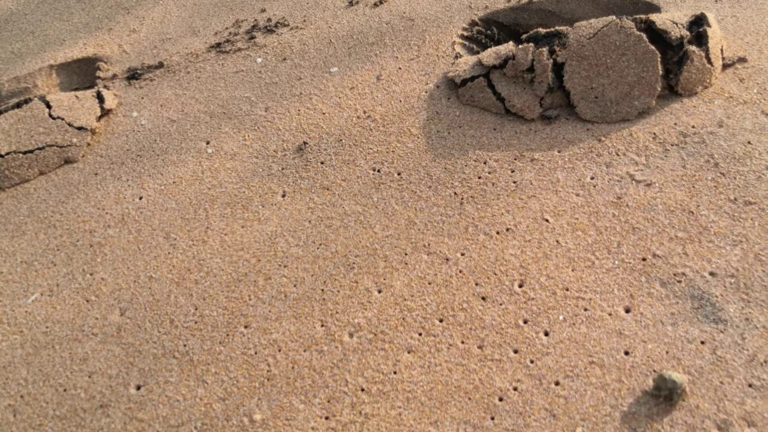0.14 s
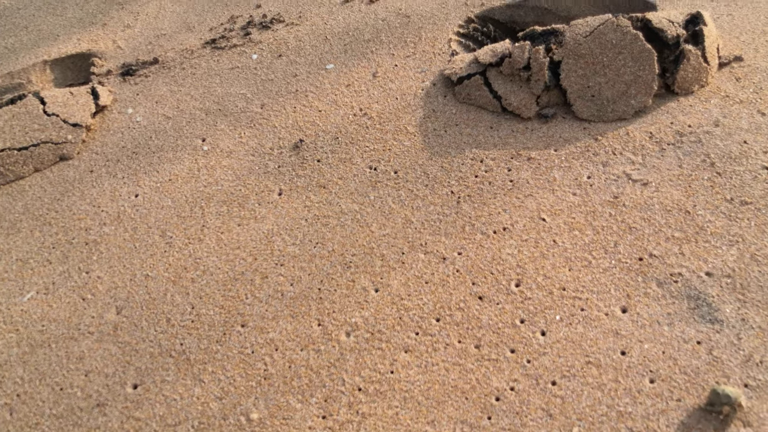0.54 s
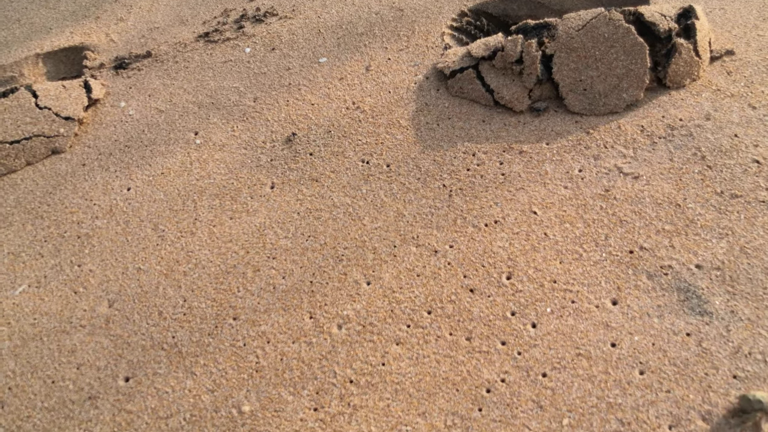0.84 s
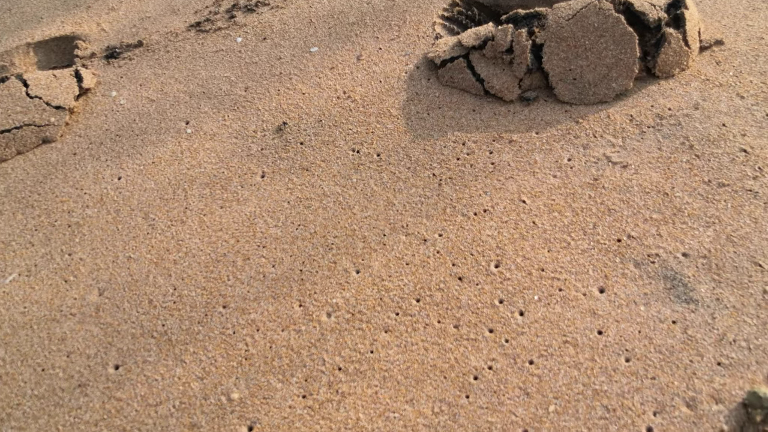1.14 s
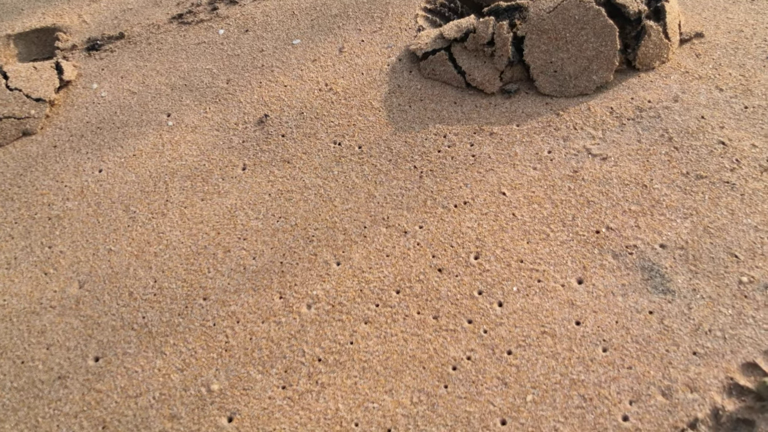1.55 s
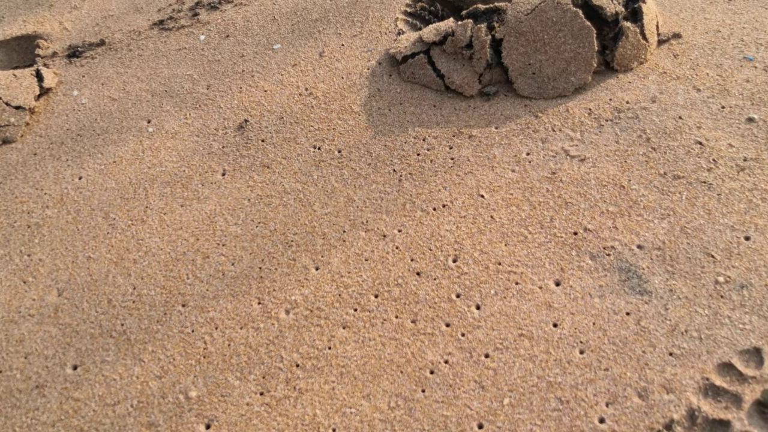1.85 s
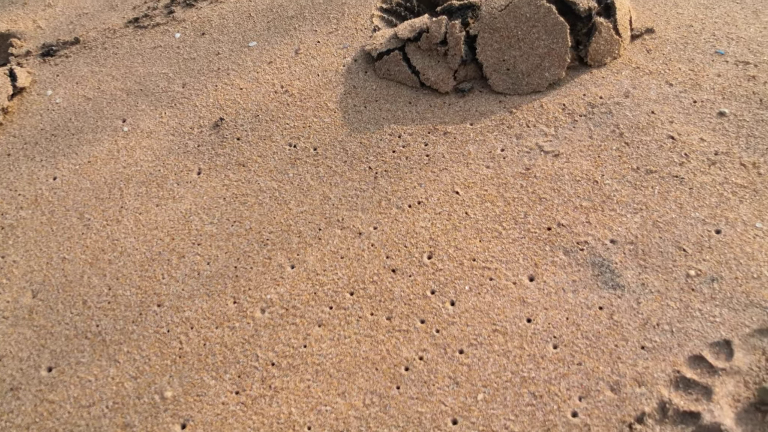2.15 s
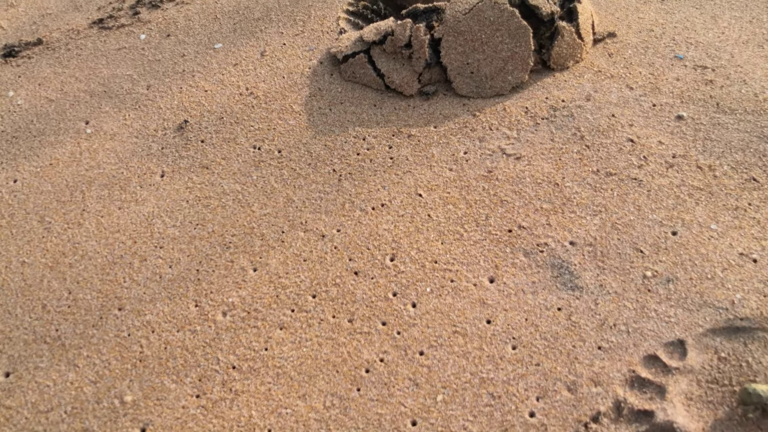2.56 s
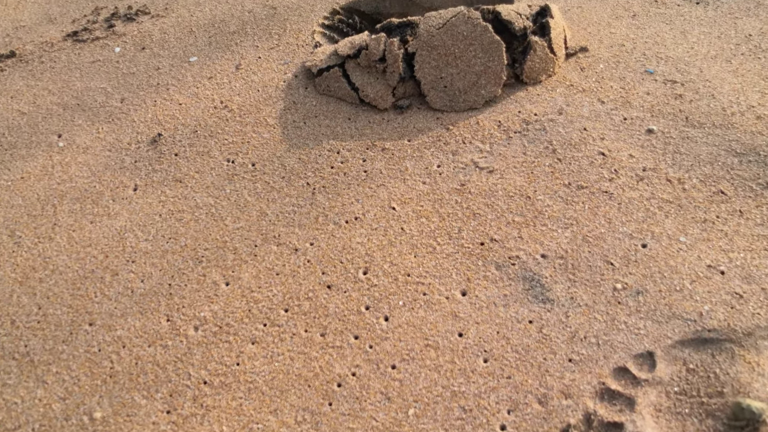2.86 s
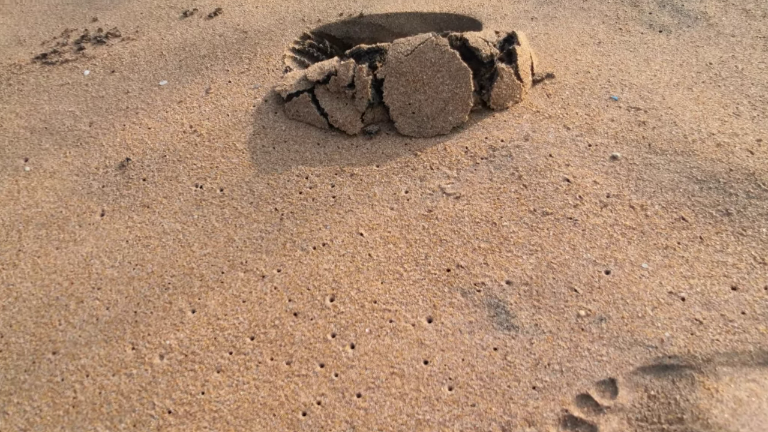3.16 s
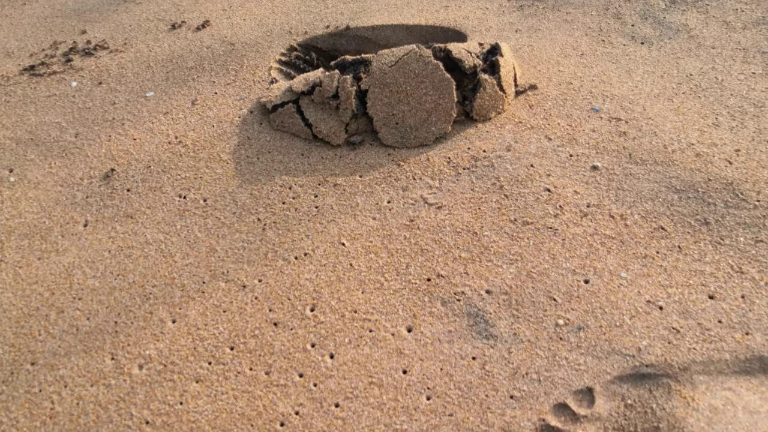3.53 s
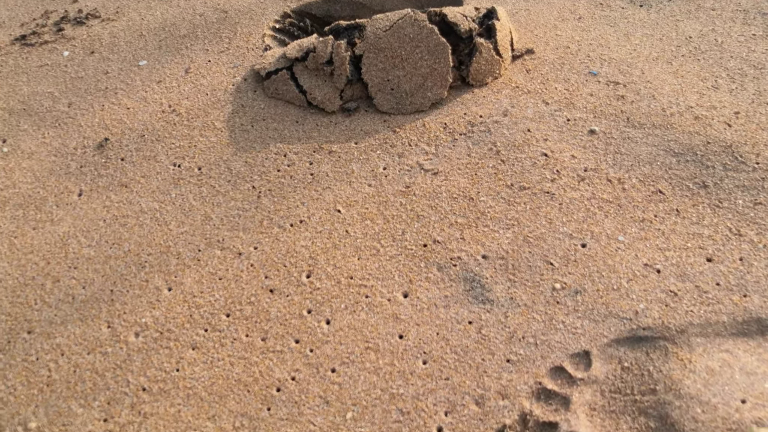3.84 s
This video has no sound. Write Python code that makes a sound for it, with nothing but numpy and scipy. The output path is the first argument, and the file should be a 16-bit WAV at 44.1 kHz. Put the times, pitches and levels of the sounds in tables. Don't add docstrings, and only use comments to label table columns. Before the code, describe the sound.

On an open sandy beach, breakers roar low and foam fizzes continuously, captured in stereo by a phone; faint gusts buffet the microphone, then several short grainy footsteps press into sand in the last part.

```python
import sys
import numpy as np
from scipy import signal
from scipy.fft import rfft, irfft, next_fast_len
from scipy.io import wavfile
from scipy.ndimage import uniform_filter1d

SR = 44100
rng = np.random.default_rng(int(sys.argv[2]) if len(sys.argv) > 2 else 0)


def voltage_ratio(decibels):
    exponent = np.asarray(decibels, float) / 20
    return 10 ** exponent


def unload_audio(sound):
    columns = np.transpose(np.atleast_2d(sound))
    steps = np.round(np.clip(columns, -1, 1) * 32767)
    wavfile.write(sys.argv[1], SR, steps.astype(np.int16))


N = 176400
TIME_S = np.arange(N) / SR
PAD = next_fast_len(N + 4096)
HZ = np.arange(PAD // 2 + 1) * SR / PAD


def unit(x):
    return x / np.sqrt(np.mean(x ** 2))


def curve(table, col):
    table = np.array(table)
    return np.interp(TIME_S, table[:, 0], table[:, col])


def over_hz(table, hz):
    table = np.array(table)
    return np.interp(np.log(hz + 1), np.log(table[:, 0] + 1), table[:, 1])


def shape(x, gain):
    return irfft(rfft(x, PAD) * gain, PAD)[..., :N]


def walk(rate_hz):
    hold = int(SR / rate_hz)
    levels = np.repeat(rng.standard_normal(N // hold + 1), hold)
    smooth = uniform_filter1d(uniform_filter1d(levels, hold), hold)
    return 1.46 * smooth[:N]


def grains(per_s, spread_db):
    present = rng.random(N) < per_s / SR
    sign = rng.standard_normal(N)
    size = rng.exponential(size=N)
    return unit(present * sign * voltage_ratio(spread_db * np.minimum(size, 4)))


def wash(src, tone, lo_hz, hi_hz, tilt_db, patchy_db, flicker_db, rate_hz):
    spectrum = rfft(src, PAD) * voltage_ratio(over_hz(tone, HZ))
    out = 0
    near = walk(rate_hz / 4)
    for hz in lo_hz * 2 ** np.arange(0, np.log2(hi_hz / lo_hz), 1 / 3):
        near = 0.8 * near + 0.6 * walk(rate_hz / 4)
        thirds = np.clip(3 * np.log2((HZ + 1) / hz), -1, 1)
        band = irfft(spectrum * np.cos(np.pi / 2 * thirds) ** 2, PAD)[..., :N]
        tilt = tilt_db * np.log2(hz / 2500)
        out = out + band * voltage_ratio(patchy_db * near + flicker_db * walk(rate_hz) + tilt)
    return unit(out)


# frequency in Hz, likeness from 0 to 1.
LIKENESS = [(100, 0.97), (220, .95), (400, 0.87), (650, 0.37), (850, 0.23), (1150, 0.51), (1700, 0.155),
            (2400, 0.4), (3200, .2), (15000, 0.058)]
# frequency in Hz, lead in radians.
LEAD = [(0, -0.5), (300, 0.97), (700, 3.5), (1250, 2.5), (1850, 6.5), (2700, 10.5), (3300, 9.5),
        (4800, 14.5), (6000, 9.5), (8000, 17)]


def ports(pair):
    like = np.clip(over_hz(LIKENESS, HZ), 0, 1)
    lead = np.array(LEAD)
    late = np.exp(-1j * np.interp(HZ, lead[:, 0], lead[:, 1]))
    shared = shape(pair[0], like * late)
    own = shape(pair[1], np.sqrt(1 - like ** 2))
    return np.array([pair[0], shared + own])


# time in seconds, level in dB.
ROAR_LEVEL = [(0.37, -36.5), (0.73, -33.5), (0.89, -36.5), (0.93, -33.5), (1.11, -36), (1.14, -32.5),
              (1.43, -35), (1.45, -34), (2.33, -36), (2.63, -33.5), (2.66, -35.5), (3.33, -32.5),
              (3.82, -35.5), (3.92, -32.5), (3.94, -39), (4.0, -33)]
# frequency in Hz, density in dB per Hz.
ROAR_TONE = [(25, -34), (50, -8.5), (100, -3.5), (170, 0.5), (280, -1.5), (430, -6.5), (650, -16),
             (1200, -21.5)]


def roar():
    noise = rng.standard_normal((2, N))
    rumble = wash(noise, ROAR_TONE, 20, 1600, tilt_db=0, patchy_db=0, flicker_db=0.5, rate_hz=10)
    return rumble * voltage_ratio(curve(ROAR_LEVEL, 1))


# time in seconds, level in dB, brightness in dB per octave.
FOAM_RUN = [(.37, -43.5, -0.5), (.42, -46.5, -0.5), (.55, -43.5, 0), (.9, -42, -0.5), (1.3, -41.5, -0.5),
            (1.57, -41.5, 0), (1.7, -42, 0.5), (2.05, -42, 0.5), (2.25, -41.5, -0.5), (2.42, -41.5, 0),
            (2.6, -40.5, -0.5), (2.85, -40.5, .5), (3.05, -39.5, 1.5), (3.3, -40.5, 0), (3.55, -41.5, 0.5),
            (3.8, -42.5, -.3), (4.0, -41, -0.5)]
# frequency in Hz, density in dB per Hz.
FOAM_TONE = [(300, -19), (700, -5), (1500, -2.5), (3000, -4), (6000, -8), (8800, -14), (9900, -25),
             (15500, -38.5)]


def foam():
    fizz_share = 0.15
    src = []
    for _ in range(2):
        fizz = grains(per_s=8000, spread_db=1)
        hiss = rng.standard_normal(N)
        src.append(np.sqrt(fizz_share) * fizz + np.sqrt(1 - fizz_share) * hiss)
    bright = curve(FOAM_RUN, 2)
    hissing = wash(np.array(src), FOAM_TONE, 268, 17000, bright, patchy_db=0.72, flicker_db=0.35, rate_hz=14)
    return hissing * voltage_ratio(curve(FOAM_RUN, 1))


# time in seconds, level in dB.
GUSTS = [(0.4, -55), (1.73, -58), (1.98, -48), (2.06, -62), (2.95, -52), (3.08, -62), (3.16, -49),
         (3.29, -63), (3.38, -43), (3.53, -58), (3.89, -54), (3.98, -41.5)]


def wind():
    rumble_hz, apart = 45, 0.08
    gain = HZ / (HZ + 15) / (1 + (HZ / rumble_hz) ** 2)
    air = unit(shape(rng.standard_normal((2, N)), gain))
    air = air * voltage_ratio(curve(GUSTS, 1) - 3)
    return air[0] + apart * air[1] * np.array([[1], [-1]])


# time of the peak in seconds, length in seconds, level in dB,
# pan in dB (positive to the left).
STEPS = [
    (2.6, .07, -49, -1),
    (2.903, .08, -40.5, 3),
    (3.0, 0.11, -47, -5),
    (3.373, 0.088, -38.5, 1),
    (3.9, 0.067, -43.5, 3),
    (3.954, 0.052, -40.5, 4.5),
]
# frequency in Hz, density in dB per Hz.
SAND_TONE = [(150, -6), (500, -1.5), (1000, 3), (3000, -2.5), (8500, -8.5), (10000, -20), (15000, -38)]


def steps():
    swell = 0
    for at_s, length_s, db, pan_db in STEPS:
        sides = voltage_ratio(db + np.array([[pan_db], [-pan_db]]) / 2)
        swell = swell + sides * np.exp(-((TIME_S - at_s) / length_s * 2) ** 2)
    crunch = np.array([grains(per_s=9000, spread_db=1.5) for _ in range(2)])
    crunch = unit(shape(crunch, voltage_ratio(over_hz(SAND_TONE, HZ))))
    return ports(crunch) * swell * voltage_ratio(1.2 * walk(60))


def scene():
    return ports(roar() + foam()) + wind() + steps()


def roll_off(x):
    return signal.sosfilt(signal.butter(12, 15410, fs=SR, output="sos"), x)


# centre in
# Hz, width in Hz, left gain in dB, right gain in dB.
BODY = [(673, 338, 6, 2), (350, 99, 0.2, 0), (1320, 274, -0.5, -3), (1956, 800, 9.5, 6), (2560, 400, 2, 2),
        (3520, 840, 3, 0), (6340, 420, -2, -5.5), (7820, 2370, 5.5, 2), (10100, 260, -9, 3.5),
        (8300, 360, -2.5, -1.5), (14900, 600, 4, 5)]


def record(dry):
    hiss_db, top_hz, offset = -76, 15080, -0.00047
    start_s, fade_s = 0.3596, 0.0013
    colour_db = 0
    for hz, width_hz, left_db, right_db in BODY:
        colour_db = colour_db + np.array([[left_db], [right_db]]) * np.exp(-((HZ - hz) / width_hz) ** 2)
    low_pass = 1 / (1 + (HZ / top_hz) ** 200)
    noisy = dry + voltage_ratio(hiss_db) * rng.standard_normal(dry.shape)
    cut = np.clip((TIME_S - start_s) / fade_s, 0, 1)
    mix = (shape(noisy, voltage_ratio(colour_db) * low_pass) + offset) * cut
    return roll_off(mix)


dry = scene()
out = record(dry)
unload_audio(out)
```